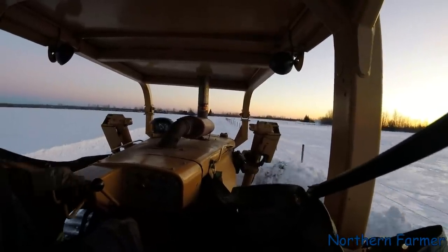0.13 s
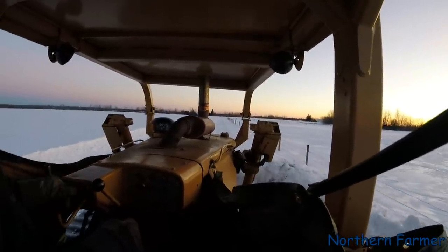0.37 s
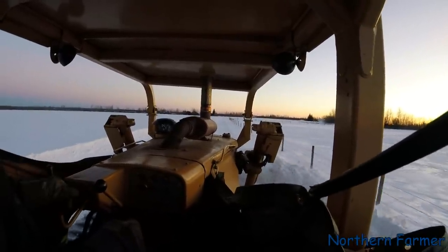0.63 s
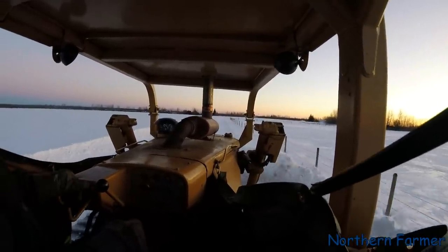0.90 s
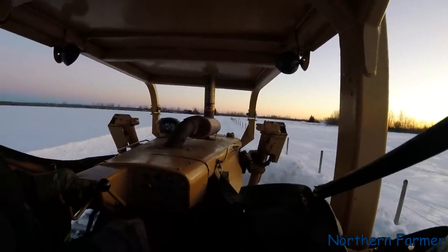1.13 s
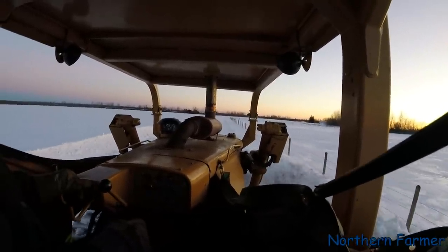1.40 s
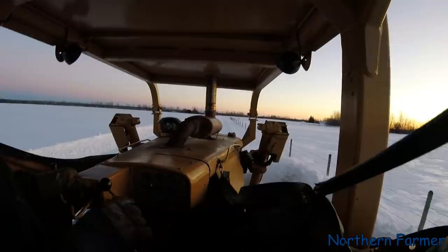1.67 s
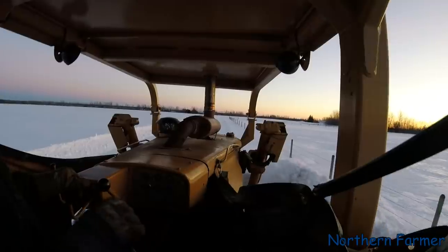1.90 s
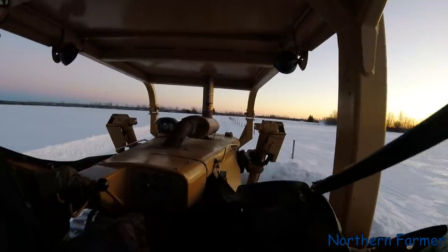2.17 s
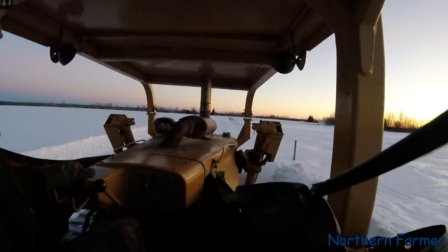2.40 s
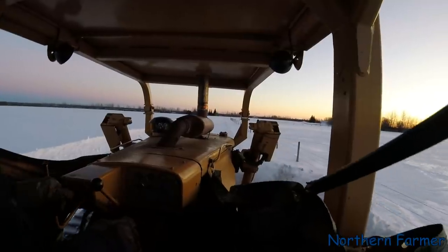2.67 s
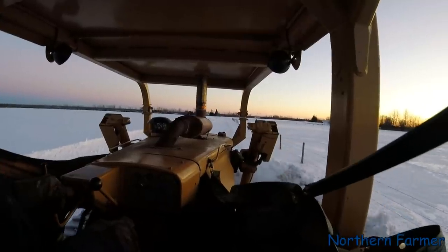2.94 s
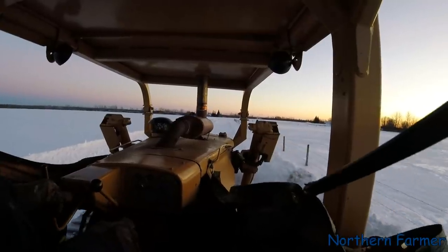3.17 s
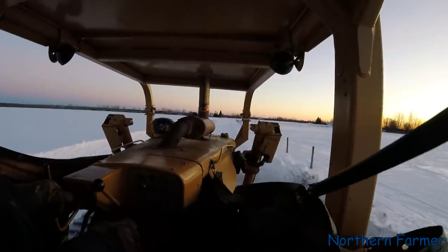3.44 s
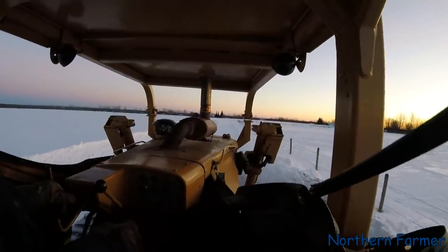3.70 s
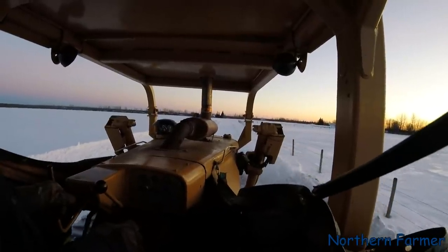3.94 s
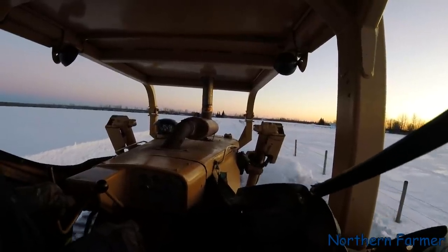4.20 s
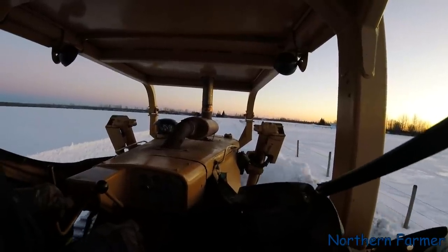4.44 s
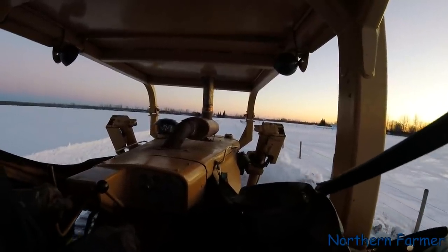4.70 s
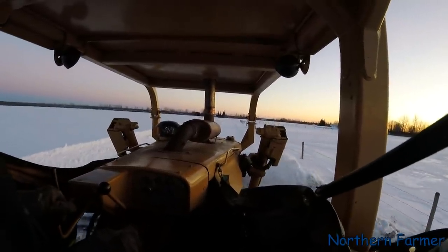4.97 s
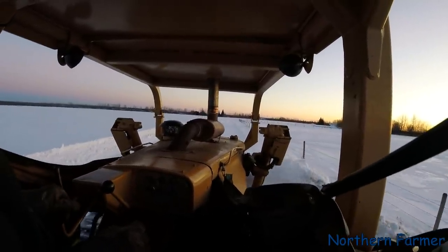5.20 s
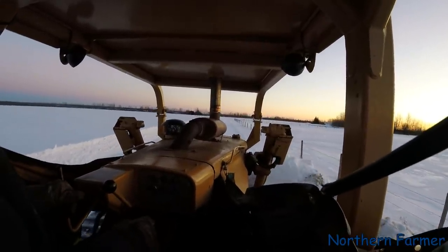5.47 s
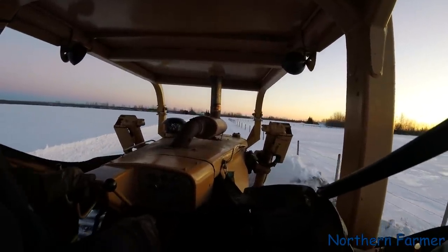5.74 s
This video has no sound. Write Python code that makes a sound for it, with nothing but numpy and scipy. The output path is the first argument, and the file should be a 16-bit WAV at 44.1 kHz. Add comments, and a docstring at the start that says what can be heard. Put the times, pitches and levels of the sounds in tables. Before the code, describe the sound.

A bulldozer works across snow, heard from its open cab for about six seconds. The diesel drones at a nearly constant low pitch, with a fan hum and coarse, rapidly puffing exhaust roar. Deep chassis rumble and buzzing canopy panels thicken it. Two related gear whines, one middle and one higher, flutter unevenly in loudness. Thin metallic track hiss and rattle continue underneath, with small squeaks at 0.2, 0.45 and 1.2 seconds. The whine creeps upward around 2 seconds, then sags abruptly near 2.7 as the blade bites, with a short wavering groan; it recovers by 3.1, amid high squeaks. Faint, gritty clanks gather from 3.6 to 4.0 and again around 4.6 seconds, with more squeaks. The whine eases slightly lower at the end while the engine keeps pulling. The sound is close, dense and full of lows, its top dulled by the microphone housing and its peaks held down.

```python
"""Bulldozer pushing snow

A diesel bulldozer heard from the open cab through a small housed microphone. Sines at multiples of the
firing rate and puffing noise make the engine; two gear meshes whine as sines and sag as the blade bites.
Shaped noise rumbles as the frame and rattles as the tracks; wavering tones squeak, noise bursts clank.
The housing dulls the top and a limiter pulls the peaks down."""
import sys
import numpy as np
from scipy import signal
from scipy.fft import rfft, irfft, next_fast_len
from scipy.io import wavfile
from scipy.ndimage import uniform_filter1d, minimum_filter1d, map_coordinates

SR = 44100
rng = np.random.default_rng(int(sys.argv[2]) if len(sys.argv) > 2 else 0)


def gain_from_db(level_db):
    """Convert decibel levels to linear amplitude factors (20 dB per decade)."""
    decades = np.asarray(level_db, float) / 20
    return 10 ** decades


def store_pcm(level_fs):
    """Save levels as 16-bit WAV."""
    pcm = np.round(np.clip(level_fs, -1, 1) * 32767).astype(np.int16)
    wavfile.write(sys.argv[1], SR, np.atleast_2d(pcm).T)


N = 257984


def unit(x):
    """Scaled to rms 1."""
    return x / np.sqrt(np.mean(x ** 2) + 1e-20)


def curves(rows):
    """One value per sample for each column after the time."""
    time_s, *columns = np.transpose(rows)
    return [np.interp(np.arange(N) / SR, time_s, column) for column in columns]


def wobble(knots_per_s):
    """A smooth random curve through normal draws."""
    knots = rng.standard_normal(int(N * knots_per_s / SR) + 4)
    return map_coordinates(knots, [np.arange(N) * knots_per_s / SR])


def coloured(x, spectrum):
    """x through (Hz, dB) points read on a log frequency axis."""
    size = next_fast_len(N + 8192)
    hz, db = np.transpose(spectrum)
    log_hz = np.log(np.fft.rfftfreq(size, 1 / SR) + 1)
    gain = gain_from_db(np.interp(log_hz, np.log(hz + 1), db, -120, -120))
    return irfft(rfft(x, size) * gain, size)[..., :N]


def patchy(spectrum, depth_db, window):
    """Coloured noise of rms 1 whose loudness wanders separately at each pitch; window in samples."""
    z = signal.stft(rng.standard_normal(N + window), nperseg=window)[2]
    field = uniform_filter1d(rng.standard_normal(z.shape), size=2, axis=0)
    field = uniform_filter1d(field, size=4, axis=1)
    noise = signal.istft(z * gain_from_db(depth_db * unit(field)), nperseg=window)[1][:N]
    return unit(coloured(noise, spectrum))


def tone(turns, rms_db, shake_rad):
    """A sine of given rms level whose phase shakes a little."""
    phase = 2 * np.pi * (turns + rng.random()) + shake_rad * wobble(25)
    return np.sqrt(2) * gain_from_db(rms_db) * np.sin(phase)


def frame():
    """Tracks rolling over frozen ground shake the chassis and the canopy panels."""
    # noise spectra: hz, relative_db
    deep = [(4, -30.5), (15, -19), (30, -9), (50, -5), (90, -2), (125, 1.5), (165, -5), (200, -12),
            (260, -42.5)]
    panels = [(150, -42.5), (200, -9.5), (235, -2), (270, -5), (310, 1), (350, -8), (450, -9), (560, -12),
              (800, -50)]
    deep_level = gain_from_db(-14 + .8 * wobble(8.8))
    panel_level = gain_from_db(-16.5 + 0.94 * wobble(8))
    rumble = deep_level * patchy(deep, depth_db=1.0, window=4096)
    return rumble + panel_level * patchy(panels, depth_db=2.0, window=4096)


def clanks():
    """Track shoes knock: short gritty scrapes, nearly two octaves wide, rise fast and die."""
    # time_s, level_db, centre_hz, time_to_fall_12_db_s
    knocks = [(0.72, -41, 5000, .05), (1.316, -41, 5000, .028), (2.229, -42, 2798, .027),
              (2.487, -37, 2980, .025), (3.19, -41, 4000, 0.023), (3.586, -34.5, 5500, 0.017),
              (3.777, -36, 8500, 0.0087), (3.867, -34.5, 8000, 0.013), (3.905, -36, 8500, .008),
              (3.934, -30.5, 4730, 0.0094), (3.965, -35, 6000, .008), (3.985, -38, 6500, .01),
              (4.012, -38, 3500, 0.017), (4.538, -35, 3300, .012), (4.55, -33, 2800, .018),
              (4.565, -34, 5000, 0.02), (4.592, -31, 3500, .021), (4.68, -36.5, 4520, .016)]
    faint_count, faint_db = 12, -44
    # weaker knocks at chance moments, the brighter the shorter
    faint = [(0.0079 + when * N / SR, faint_db + 3 * hard, 3000 * 2.7 ** bright, 0.0087 + 0.013 * (1 - bright))
             for when, hard, bright in rng.random((faint_count, 3))]
    out, t = np.zeros(N + SR), np.arange(SR // 8) / SR
    for time_s, db, hz, fall_s in knocks + faint:
        band_hz = [hz / 2.4, min(hz * 1.53, 20000)]
        band = signal.butter(2, band_hz, "bandpass", fs=SR, output="sos")
        grit = rng.standard_normal(len(t)) * (rng.random(len(t)) < .12)
        burst = unit(signal.sosfilt(band, grit))
        envelope = gain_from_db(db + 6.5 - 12 * t / fall_s) * (1 - np.exp(-t / .003))
        out[round((time_s - .005) * SR):][:len(t)] += envelope * burst
    return out[:N]


def squeals(rows, waver_rad, octave_db):
    """Stick-slip at a metal resonance: a swelling, wavering tone with a weak octave."""
    out = np.zeros(N + SR)
    for peak_s, db, hz, length_s in rows:
        swell = np.hanning(round(length_s * SR)) ** .6
        # the phase walks at random, waver_rad a sample
        walk = np.cumsum(rng.standard_normal(SR // 2)[:len(swell)])
        phase = 2 * np.pi * hz * np.arange(len(swell)) / SR + waver_rad * walk
        voice = np.sin(phase) + gain_from_db(octave_db) * np.sin(2 * phase)
        out[round((peak_s - length_s / 2) * SR):][:len(swell)] += gain_from_db(db + 2.5) * swell * voice
    return out[:N]


def pins_and_groan():
    """Dry track pins squeak by stick-slip; the frame groans lower as the blade bites."""
    # peak_s, level_db, pitch_hz, length_s
    squeaks = [(.168, -34.5, 6930, .055), (.43, -36, 6834, .04), (.468, -35, 5480, .075),
               (1.229, -35, 5460, .065), (2.908, -32.5, 6830, .076), (2.947, -34, 6880, .02),
               (2.987, -34.5, 7070, .018), (3.065, -39.5, 6820, .065), (3.94, -36, 5420, .02),
               (3.988, -35.5, 5484, .02), (4.014, -40.5, 6900, .067), (4.564, -38.5, 7040, .054)]
    groan = [(2.66, -18, 431.5, .2)]
    return squeals(squeaks, waver_rad=.055, octave_db=-18) + squeals(groan, waver_rad=.015, octave_db=-17.5)


def tracks():
    """Small metal contacts in uneven bursts over a hiss of briefly ringing links."""
    # metal spectrum: hz, relative_db
    metal = [(940, -28.5), (1600, -6), (2810, -4), (4360, -14), (4830, -14.5), (5610, -6.5), (6100, -10),
             (6700, -6.5), (7400, -11), (9130, -19), (11500, -23.5), (15000, -24.5)]
    # how hard the track chain rattles: time_s, rms_db
    rattle = [(0, -37), (1.4, -35), (1.9, -35.5), (2.9, -34.5), (3.4, -37), (3.8, -33.5), (4.2, -36.5),
              (4.65, -35), (5.1, -37), (5.85, -34.5)]
    ticks = rng.standard_normal(N) * (rng.random(N) < .08)
    bursts = gain_from_db(4.6 * np.tanh(wobble(9)) + 3.7 * np.tanh(wobble(35)))
    contacts = unit(coloured(bursts * ticks, metal))
    hiss = patchy(metal, depth_db=3.0, window=1024)
    return gain_from_db(curves(rattle)[0]) * unit(hiss + 0.72 * contacts)


def gears():
    """Two meshes on the drive shaft; uneven teeth make them flutter and the shaft speed shivers."""
    # drive shaft speed as the upper mesh's pitch: time_s, pitch_hz
    shaft = [(0, 1100), (.3, 1088), (.5, 1089), (.7, 1105), (.95, 1121), (1.15, 1110), (1.5, 1112),
             (1.9, 1146), (2.47, 1151), (2.58, 1085), (2.72, 1000), (2.82, 1052), (3.1, 1105), (3.9, 1102),
             (4.1, 1114), (4.3, 1105), (4.5, 1116), (4.7, 1103), (5.0, 1102), (5.5, 1088), (5.75, 1074),
             (5.85, 1056)]
    # how loud the meshes sing: time_s, upper_db, lower_db
    singing = [(0, -28, -26), (.3, -24.5, -18.5), (.58, -26.5, -19), (.75, -25, -24.5), (1.1, -32, -20),
               (1.3, -27.5, -26), (1.65, -34, -22), (2.0, -29, -23), (2.45, -30, -23.5), (2.62, -33, -25),
               (2.75, -30, -31), (2.9, -26.5, -27), (3.0, -29, -19), (3.4, -27.5, -19.5),
               (4.05, -30, -24.5), (4.3, -34, -20.5), (4.5, -30, -27), (4.65, -25, -19.5),
               (4.85, -32.5, -22.5), (5.15, -27, -18.5), (5.5, -26, -18), (5.85, -31, -26)]
    # partials of each mesh: multiple_of_mesh, relative_db
    upper_partials = [(.8, -16), (1, 1), (1.45, -26), (2, -19.5)]
    lower_partials = [(1, 1), (2, -15.5), (3, -29)]
    low_mesh = .577  # tooth ratio of lower to upper mesh
    bite_s, bite_length_s = 2.66, .14  # the drive slackens and the pitch jitters round this moment

    def flutter_db(slow, fast):
        """Uneven teeth: slow bounded level swings plus fast free ones."""
        return slow * np.tanh(wobble(14)) + fast * wobble(25)

    hz, = curves(shaft)
    upper_db, lower_db = curves(singing)
    slack = np.exp(-((np.arange(N) / SR - bite_s) / bite_length_s) ** 4)
    shiver = 1 + .003 * wobble(12) + .026 * slack * wobble(60)
    turns = np.cumsum(hz * shiver) / SR
    upper = sum(tone(k * turns, upper_db + db + flutter_db(3.4, 2.34), shake_rad=0.47)
                for k, db in upper_partials)
    lower = sum(tone(k * low_mesh * turns, lower_db + db + flutter_db(2.8, 1.8), shake_rad=0.36)
                for k, db in lower_partials)
    return upper + lower


def engine():
    """Firing tone, octave, fan and crank orders on one shaft; the exhaust roar puffs once a firing."""
    # crank speed and exhaust tones: time_s, firing_rate_hz, firing_db, octave_db
    firing = [(0, 68.45, -25, -26), (.3, 67.97, -17, -21.5), (.8, 68.55, -21.5, -18),
              (1.4, 68.95, -20, -25), (2.1, 69.1, -19.5, -17.5), (2.9, 68.0, -19, -29.5),
              (3.6, 68.0, -18.5, -21), (4.4, 68.27, -22, -20), (5.0, 68.81, -17, -24),
              (5.85, 68.83, -16.5, -23.5)]
    # fan tone: time_s, level_db
    fan_level = [(0, -23), (1.2, -22), (1.7, -16.5), (2.4, -23), (3.1, -27.5), (4.1, -21), (4.7, -19.5),
                 (5.85, -23.5)]
    # weaker crank orders: multiple_of_firing, level_db
    crank = [(.333, -53), (1.667, -27), (2.47, -27.5), (3.333, -29.5), (4.17, -33.5), (5, -31.5),
             (5.52, -35.5), (6.46, -34.5), (6.81, -36.5)]
    # exhaust noise spectrum: hz, relative_db
    roar_spectrum = [(400, -49), (560, -2.5), (680, 2), (800, -5.5), (1050, -7), (1320, -9), (1450, -17.5),
                     (1750, -20.5), (2300, -25.5), (3000, -52)]
    waver_db = 2  # bound of the firing tone's waver; the octave wavers twice as far
    fan_order = 3.92  # fan blades passing, per firing

    hz, fire_db, octave_db = curves(firing)
    fan_db, = curves(fan_level)
    turns = np.cumsum(hz) / SR
    tones = tone(turns, fire_db + waver_db * np.tanh(wobble(5)), shake_rad=0.17)
    tones += tone(2 * turns, octave_db + 2 * waver_db * np.tanh(wobble(7)), shake_rad=0.34)
    tones += tone(fan_order * turns, fan_db + 3 * wobble(9), shake_rad=0.7)
    tones += sum(tone(k * turns, db + 2.2 * wobble(3.08), shake_rad=.3) for k, db in crank)
    puffs = 1 + 0.11 * np.cos(2 * np.pi * turns)
    roar = unit(coloured(puffs * rng.standard_normal(N), roar_spectrum))
    return tones + gain_from_db(-22 + 0.94 * wobble(7)) * roar


def scene():
    """Everything reaches the one microphone in the cab."""
    return (frame() + clanks() + pins_and_groan() + tracks() + gears() + engine())[None]


def housing(x):
    """The microphone housing dulls the top octave."""
    # response: hz, gain_db
    response = [(1, -1.5), (8000, 1.5), (10000, -2.5), (12000, -13), (15200, -19.5), (22000, -60)]
    return coloured(x, response)


def limiter(x):
    """A fast gain, smoothed round each peak, pulls it down; the rest clips softly."""
    need = np.minimum(1, 1.04 / (np.abs(x) + 1e-9))
    gain = uniform_filter1d(minimum_filter1d(need, size=600), size=500)  # samples
    held = x * gain
    return held / (1 + np.abs(held / 1.18) ** 5) ** (1 / 5)


def roll_off(x):
    """The treble ends steeply here."""
    return signal.sosfilt(signal.butter(12, 15140, fs=SR, output="sos"), x)


def record(dry):
    """The housed microphone hears the scene, then the limiter holds its peaks."""
    mix = limiter(housing(dry))
    return roll_off(mix)


dry = scene()
out = record(dry)
store_pcm(out)
```